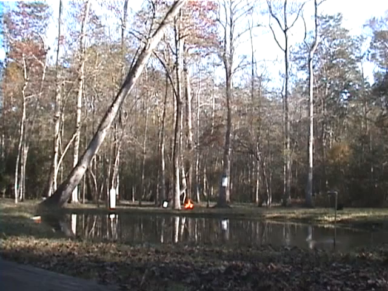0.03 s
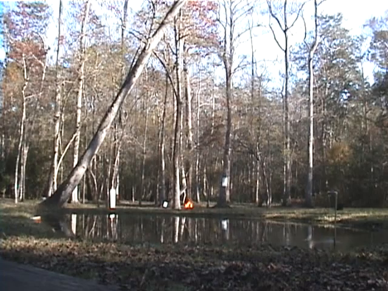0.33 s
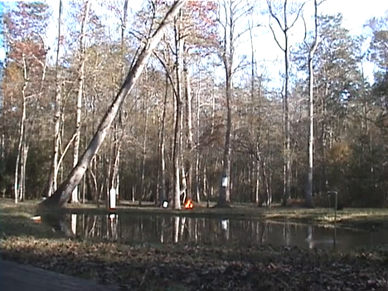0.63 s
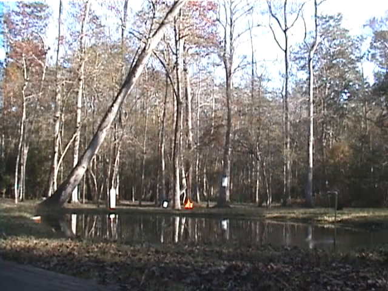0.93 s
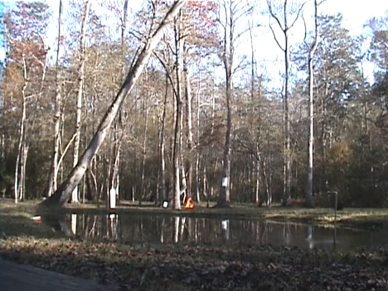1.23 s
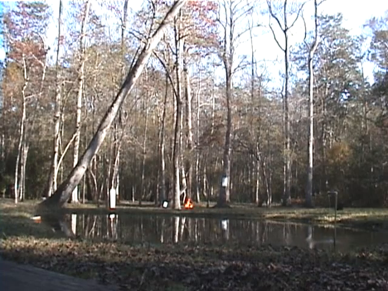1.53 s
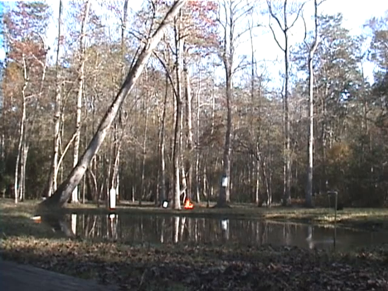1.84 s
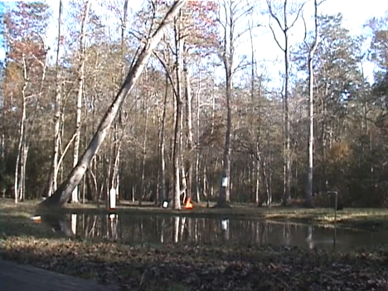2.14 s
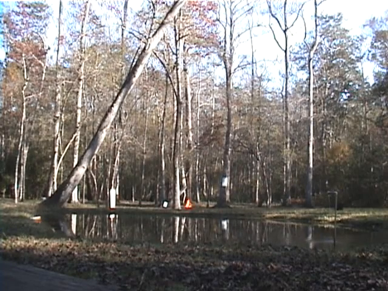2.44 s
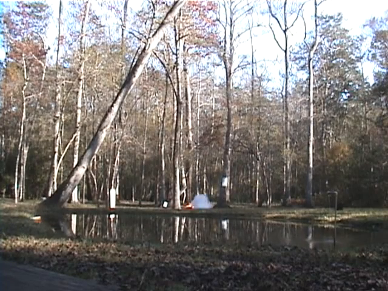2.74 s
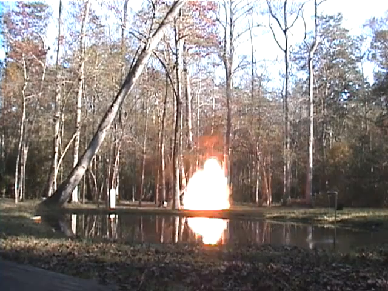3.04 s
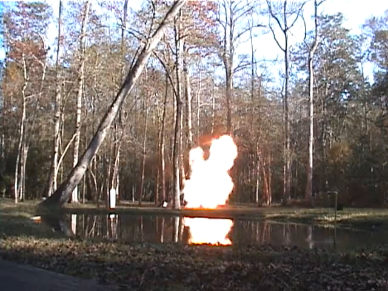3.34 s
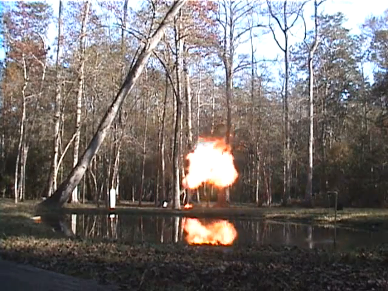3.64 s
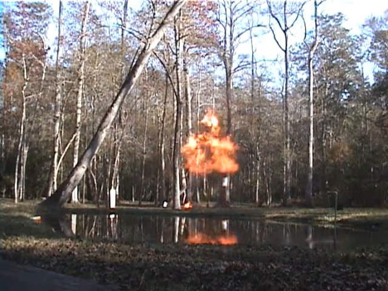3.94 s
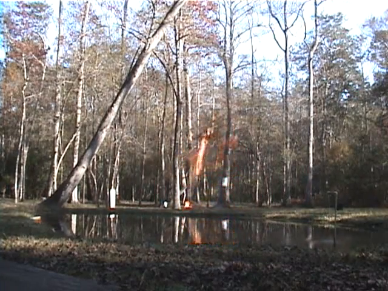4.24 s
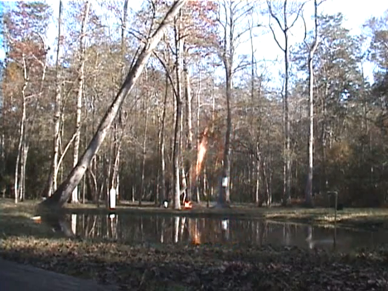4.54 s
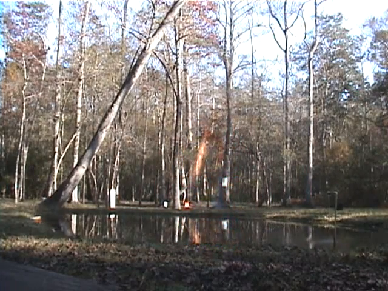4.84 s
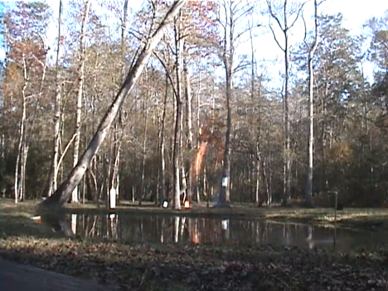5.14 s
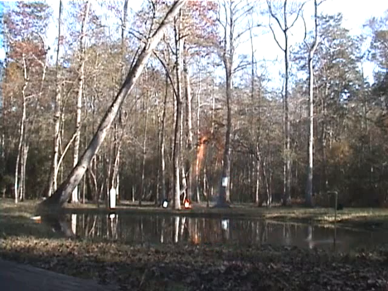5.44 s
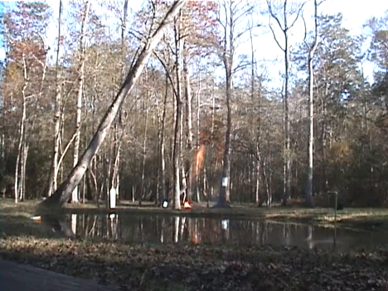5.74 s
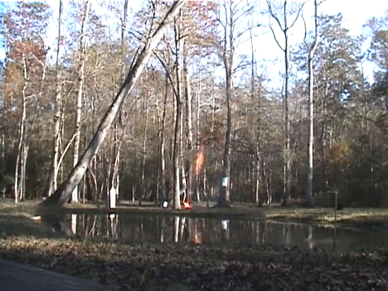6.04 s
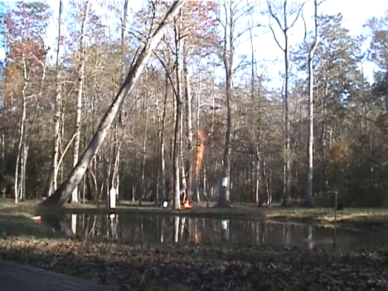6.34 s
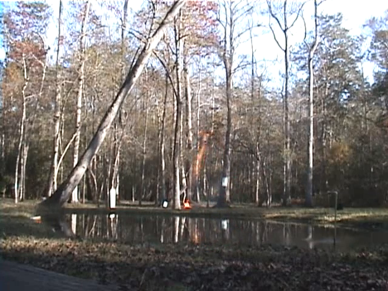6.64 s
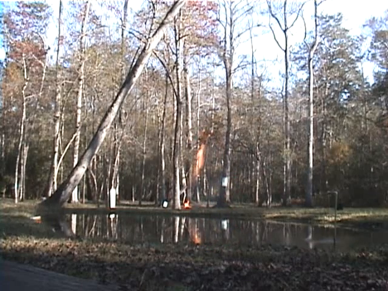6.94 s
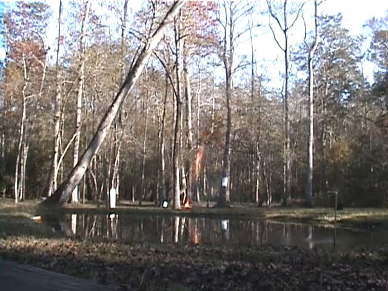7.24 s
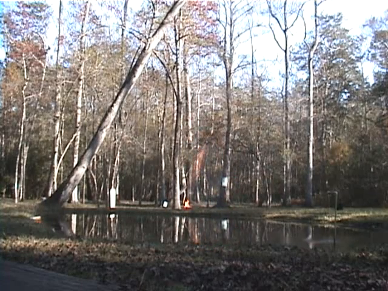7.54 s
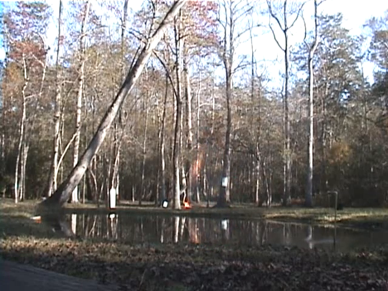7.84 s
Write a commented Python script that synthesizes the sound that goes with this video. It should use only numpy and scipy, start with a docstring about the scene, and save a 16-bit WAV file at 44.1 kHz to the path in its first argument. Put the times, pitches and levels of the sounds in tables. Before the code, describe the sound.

At the quiet edge of a wood, a small fire ticks faintly across a pond and a bird gives a few thin whistles. Suddenly a propane tank bursts with a sharp crack that overloads the microphone, and a rush of gas echoes among the trees. The cloud lights with a deep, rumbling whoomph. Escaping gas then settles into a weaker, sputtering hiss with brief rough whistles, over a low, fluttering roar of flame.

```python
"""A quiet spell at the edge of a wood, heard across a pond: faint ticks of a small fire, a thin bird.
Then a propane tank lying by the fire cracks open, and the blast overloads the microphone.
The rush of gas echoes among the trees and lights as a rumbling fireball. The rest of the gas keeps
hissing out of the hole and burns as a tall, fluttering, roaring jet."""
import sys
import numpy as np
from scipy import signal
from scipy.fft import rfft, irfft
from scipy.io import wavfile

SR = 44100
rng = np.random.default_rng(int(sys.argv[2]) if len(sys.argv) > 2 else 0)


def waveform_to_disk(signal):
    """Save audio, clipped to [-1, 1], as 16-bit WAV at the path in sys.argv[1]."""
    frames = np.transpose(np.atleast_2d(signal))
    scaled = np.clip(frames, -1, 1) * 32767
    samples = np.round(scaled).astype(np.int16)
    wavfile.write(sys.argv[1], SR, samples)


N = 357210
BURST_S, CUTOFF_HZ = 2.655, 15750

# the far bank at the microphone: (frequency [Hz], left-right likeness [0-1], left minus right [dB])
FAR_BANK_IMAGE = [(60, 1, -0.5), (249, .99, -0.7), (604, 0.98, -1.5), (1250, 1, -1), (2370, 1, 0.7),
                  (6500, 0.71, -1.3), (12600, 0.23, 0.5)]
# spurts of gas: (time [s], length [s], lift of the hiss [dB], whistle pitch [Hz], whistle level [dB])
SPURTS = [(3.93, .05, 1, 2920, -25.5), (4.036, .06, -1, 2700, -25), (4.262, .04, 1.5, 2370, -31),
          (4.796, .06, 3, 1800, -43), (5.205, 0.17, 1.5, 2500, -31), (5.444, .04, 3.5, 1890, -34),
          (5.572, 0.063, 3, 2800, -36), (5.784, 0.069, 2.5, 2470, -34.5), (5.91, 0.023, 1, 2200, -33),
          (6.35, 0.085, 2.5, 5400, -35), (6.654, .04, 2.5, 5500, -36), (7.536, 0.078, 2, 2500, -39)]


def burst():
    """The tank tears open: shock fronts, a thump, and a rush of gas dying away among the trees."""
    # the blast, spread wide by the trees: (frequency [Hz], likeness [0-1], left minus right [dB])
    blast_image = [(100, .997, 0), (550, 0.96, -1.8), (1200, 0.94, -0.41), (2500, 0.84, 0.34),
                   (6100, 0.58, 0), (9000, .1, 0)]
    # rushing gas: (frequency [Hz], relative level [dB])
    rush_spectrum = [(110, -13), (280, -3), (500, -3.5), (760, -5.5), (1220, 0), (2400, 2), (3900, -8),
                     (7150, -11.5), (8260, -18.5), (9400, -41), (15000, -71.5)]
    # shock fronts: (time [s], level [dB], t60 [s])
    fronts = [(2.656, 3.5, .024), (2.6674, -7, 0.027), (2.678, 0, 0.0097)]
    # the thump behind them: (time [s], pitch [Hz], level [dB], t60 [s])
    thumps = [(2.681, 230, -1, 0.073)]
    age = since(BURST_S)
    # octave tilt: duller from deeper in the wood, with one bright echo off the far side of the wood
    tilt_db = .37 - 5 * age + 1.3 * swell(2.82, .1)
    spray = turbulence(rush_spectrum, blast_image, tilt_db, pivot_hz=1500, eddy_db=1.33, eddy_rate=36)
    rush = spray * from_db(-6.5 - 18 * age ** 1.56) * ramp(BURST_S, .0012)   # dies ever faster
    crack = turbulence([(800, -23), (1800, 5), (4000, -3), (8000, -10), (14000, -29)], blast_image)
    # a few milliseconds of tearing lead in each front
    shocks = crack * sum(from_db(db) * (dying(s, t60) + from_db(-19) * dying(s - .0023, t60))
                         for s, db, t60 in fronts)
    thump = sum(from_db(db) * dying(s, t60) * np.sin(2 * np.pi * hz * since(s))
                for s, hz, db, t60 in thumps)
    return rush + shocks + wood(thump, echo_db=-4, t60=1).mean(axis=0)


def fireball():
    """The burst shoves the air aside, then the cloud lights with a whoomph and billows up, rumbling."""
    # the rumble: (frequency [Hz], relative level [dB])
    rumble_spectrum = [(15, -11.5), (30, -4), (55, 7), (100, 6), (200, -22)]
    # shoves of air at the burst and as the cloud lights: (time [s], level [dB], t60 [s])
    air_shoves = [(2.655, -41, 0.34), (3.105, -22, 0.51)]
    attack_s = .02
    shoves = sum(from_db(db) * dying(s, t60) * ramp(s, attack_s) for s, db, t60 in air_shoves)
    billow = from_db(-28.5) * swell(peak=3.85, length=1) * ramp(BURST_S, attack_s)
    return turbulence(rumble_spectrum, FAR_BANK_IMAGE) * (shoves + billow)


def jet():
    """Gas gushes from the hole, then settles to a weaker hiss that sputters and spurts."""
    # the hiss from across the water: (frequency [Hz], relative level [dB])
    hiss_spectrum = [(440, -12), (750, -5), (809, -13.5), (1040, -8.5), (1210, -3.5), (1410, -5),
                     (1730, -1), (2560, -0.5), (4370, -6), (5210, -4), (6890, -4), (8990, -13),
                     (11300, -19.5), (14000, -17.5), (15500, -20)]
    # the settled flow: (time [s], relative level [dB])
    flow = [(4.3, -31.5), (4.42, -31), (4.98, -31), (5.48, -32.5), (5.79, -35.5), (7.37, -33), (7.57, -36),
            (8.1, -35.5)]
    gush_s, gush_db = 3.033, -22
    age = since(gush_s)
    # octave tilt: the hiss is thin while the gush builds, and thins again as the tank empties
    tilt_db = -.64 + 7 * np.exp(-age / .32) + .45 * age
    hiss = turbulence(hiss_spectrum, FAR_BANK_IMAGE, tilt_db, pivot_hz=3760, eddy_db=1.2, eddy_rate=16)
    settled = ramp(4.11, .088)
    flow_db = (1 - settled) * gush_db + settled * (in_time(flow) + 3)
    spurt_db = sum(lift_db * swell(s, length) for s, length, lift_db, _, _ in SPURTS)
    sputter_db = .5 * drift(21)
    return hiss * from_db(flow_db + spurt_db + sputter_db) * ramp(gush_s, .35)


def flame():
    """Eddies of gas burn in uneven puffs: a low, fluttering roar that catches as the cloud lights."""
    # the roar: (frequency [Hz], relative level [dB])
    roar_spectrum = [(13, -54), (22, -36), (67, -8.5), (142, 0.5), (206, -2.5), (360, -7.5), (531, -21.5),
                     (592, -23.5), (795, -38), (900, -37), (1170, -53), (1980, -120)]
    # fine eddies brighten it: (time [s], tilt [dB per octave])
    brightness = [(3.1, -2), (3.4, 1), (3.75, -1), (4.0, 5), (5.0, -0.5), (6.2, -2), (6.6, -1), (7.0, 1.5),
                  (8.1, -2)]
    roar = turbulence(roar_spectrum, FAR_BANK_IMAGE, in_time(brightness),
                      pivot_hz=183, eddy_db=1, eddy_rate=19)
    puff_db = drift(41)
    growth = 1 - np.exp(-since(2.914) / .34)
    return roar * from_db(-17 + puff_db) * growth


def edge_whistles():
    """Now and then the gas catches the torn edge and swells into a broad, rough whistle."""
    return sum(from_db(db) * resonant_noise(hz, q=4) * swell(s, length)
               for s, length, _, hz, db in SPURTS)


def small_fire():
    """Dry ticks and soft pops, each a puff of resonant noise, over fainter random crackles."""
    # ticks and pops: (time [s], relative level [dB], resonance [Hz])
    pops = [(.2053, -35, 4800), (.308, -35, 3300), (.405, -31, 550), (0.439, -32, 2190), (.652, -37, 3300),
            (0.722, -29.5, 8250), (.907, -30, 2780), (1.412, -35, 7000), (1.489, -40, 560),
            (1.8611, -40, 6850), (2.3241, -26, 5650), (2.355, -30, 2700)]
    ticks = sum(from_db(db - 5.5) * resonant_noise(hz, q=3.1) * dying(s, t60=.012 + 20 / hz)
                for s, db, hz in pops)
    crackles_per_s, decay_s = 24, .001
    onsets = rng.random(N) < crackles_per_s / SR
    clicks = onsets * from_db(4.3 * np.minimum(rng.exponential(1, N), 3))
    envelope = signal.lfilter([1], [1, -np.exp(-1 / (decay_s * SR))], clicks + 1e-18)
    crackle = from_db(-49.5) * resonant_noise(5300, q=.59) * envelope
    return wood(ticks + crackle, echo_db=-12, t60=.3)


def bird():
    """A bird among the trees: each thin whistle slides up to its pitch and holds."""
    # whistles: (time [s], length [s], pitch [Hz], level [dB])
    notes = [(1.618, .06, 6720, -51), (1.62, .08, 4000, -57), (1.79, .13, 2130, -50)]
    song = np.zeros(N)
    for s, length, hz, db in notes:
        through = ramp(s, length)
        pitch = hz * (1 - .27 * np.exp(-8 * through) + .0094 * drift(79))
        song += from_db(db) * np.sqrt(4 * through * (1 - through)) * tone(pitch)
    return wood(song, echo_db=-1, t60=.55)


def outdoors():
    """Still air around the pond, one faint breeze in the leaves and a far drone."""
    # sound from all around: (frequency [Hz], likeness [0-1], left minus right [dB])
    surround_image = [(60, 0.93, -10.5), (380, 0.25, -2.5), (2320, 0.92, 1.5), (15000, 0.1, -1.5)]
    # open air: (frequency [Hz], relative level [dB])
    air_spectrum = [(22, -22), (60, -3.5), (124, -7), (200, -5), (320, -15.5), (560, -13.5), (750, -16.5),
                    (1110, -14), (1800, -17.5), (2600, -17), (4000, -24), (7500, -27.5), (10000, -40.5),
                    (15500, -34)]
    # stirring leaves: (frequency [Hz], relative level [dB])
    leaf_spectrum = [(1500, -20), (2200, -1), (2800, 1), (3400, -13), (7000, -18), (10000, -19)]
    air = from_db(-45.43) * turbulence(air_spectrum, surround_image, eddy_db=1.8, eddy_rate=5.1)
    leaves = turbulence(leaf_spectrum, surround_image) * from_db(-52 + 3.5 * drift(25))
    drone = turbulence([(100, -5), (122, 9.5), (150, -17), (190, 6), (240, -10)], surround_image)
    return air + leaves * swell(peak=1.85, length=1) + from_db(-48.5) * drone * ramp(1.68, .11)


def camera_motor():
    """The camera's motor hums and whines by the microphone, wavering in level and pitch."""
    # motor tones: (pitch [Hz], relative level [dB])
    partials = [(123.8, -56), (568, -65), (2099, -60.5), (3515, -63.5), (5529, -68), (15735, -64)]
    return sum(from_db(db + 2 + 1.6 * drift(6.3)) * tone(hz + 3 * drift(11.5)) for hz, db in partials)


def wood(x, echo_db, t60, count=90):
    """Trunks throw back a scatter of short echoes, different left and right."""
    delay_s = rng.uniform(.01, .6, (2, count))
    strength = rng.standard_normal((2, count)) * from_db(-60 * delay_s / t60)
    echoes = np.zeros((2, SR))
    np.put_along_axis(echoes, (delay_s * SR).astype(int), strength, axis=1)
    echoes /= np.sqrt(np.sum(echoes ** 2) / 2)
    return x + from_db(echo_db) * signal.fftconvolve(x[None], echoes, axes=1)[:, :N]


def turbulence(spectrum, image, tilt_db=0, pivot_hz=1000, eddy_db=0, eddy_rate=10):
    """Stereo noise; given eddies, its octaves flutter separately and tilt by tilt_db per octave."""
    hz = np.maximum(np.arange(N // 2 + 1) * SR / N, 1)
    octaves_outside = np.abs(np.log2(hz / np.clip(hz, spectrum[0][0], spectrum[-1][0])))
    colour = from_db(at_hz(spectrum, hz) - 30 * octaves_outside)
    mid, side = rfft(rng.standard_normal((2, N))) * rms_one(colour)
    alike = np.clip(at_hz(image, hz), 0, 1)
    left_right = np.array([[1], [-1]])
    both = np.sqrt((1 + alike) / 2) * mid + np.sqrt((1 - alike) / 2) * side * left_right
    both = both * from_db(left_right * at_hz(image, hz, column=2) / 2)
    if eddy_db == 0:
        return irfft(both, N)
    out = 0
    for centre in 16000 / 2 ** np.arange(11):
        flutter_db = eddy_db * drift(eddy_rate)
        if spectrum[0][0] / 2 < centre < spectrum[-1][0] * 2:
            band = irfft(both * np.maximum(1 - np.abs(np.log2(hz / centre)), 0), N)
            out = out + band * from_db(flutter_db + tilt_db * np.log2(centre / pivot_hz))
    return out


def resonant_noise(hz, q):
    """Noise of rms 1 in one resonance, with steep flanks."""
    peak = signal.iirpeak(min(hz, CUTOFF_HZ), q, fs=SR)
    return rms_one(signal.lfilter(*peak, signal.lfilter(*peak, rng.standard_normal(N))))


def drift(rate):
    """A smooth random wander of rms 1, changing about rate times a second."""
    hop, run_in = 40, 2000
    pole = np.exp(-2 * np.pi * rate * hop / SR)
    noise = rng.standard_normal(N // hop + run_in + 2)
    slow = signal.lfilter([1], [1, -2 * pole, pole * pole], noise)[run_in:]
    return np.interp(np.arange(N) / hop, np.arange(len(slow)), rms_one(slow))


def tone(hz):
    """A sine that follows a moving pitch."""
    return np.sin(2 * np.pi * np.cumsum(hz) / SR)


def from_db(db):
    """Decibels to gain."""
    return 10 ** (np.asarray(db) / 20)


def rms_one(x):
    """Scale to rms 1."""
    return x / np.sqrt(np.mean(x ** 2) + 1e-20)


def seconds():
    """Time of every sample."""
    return np.arange(N) / SR


def in_time(rows):
    """A (time, value) curve at every sample."""
    return np.interp(seconds(), *np.array(rows).T)


def at_hz(rows, hz, column=1):
    """One column of a table, read on a log-frequency axis."""
    return np.interp(np.log(hz), np.log(np.array(rows)[:, 0]), np.array(rows)[:, column])


def ramp(start, length):
    """Rise from 0 to 1."""
    return np.clip((seconds() - start) / length, 0, 1)


def since(start):
    """Seconds gone by since a moment, 0 before it."""
    return np.maximum(seconds() - start, 0)


def swell(peak, length):
    """A smooth rise to 1 and fall back."""
    return np.exp(-2 * ((seconds() - peak) / length) ** 2)


def dying(start, t60):
    """Sudden start, exponential decay."""
    age = seconds() - start
    return (age >= 0) * from_db(-60 * np.clip(age / t60, 0, 4))


def scene():
    """The quiet wood, the burst and the blaze, as they reach the near bank."""
    quiet = outdoors() + camera_motor() + small_fire() + bird()
    return quiet + burst() + fireball() + jet() + edge_whistles() + flame()


def record(dry):
    """The microphone opens after a moment, flattens the loudest peaks and loses the top treble."""
    ceiling = .95
    driven = dry * ramp(.128, .0018)
    clipped = driven / (1 + (driven / ceiling) ** 6) ** (1 / 6)
    return signal.sosfilt(signal.ellip(12, .1, 70, CUTOFF_HZ, fs=SR, output="sos"), clipped)


dry = scene()
out = record(dry)
waveform_to_disk(out)
```